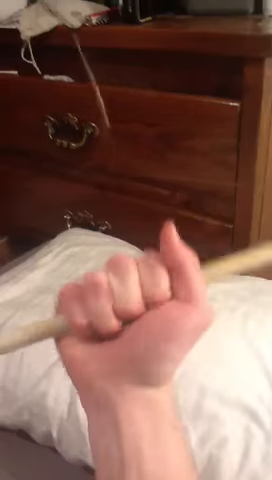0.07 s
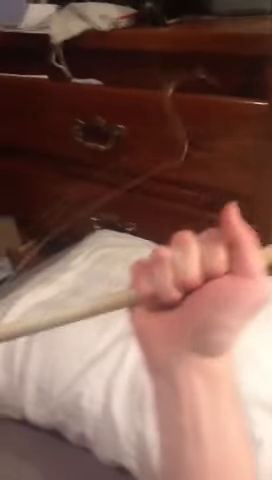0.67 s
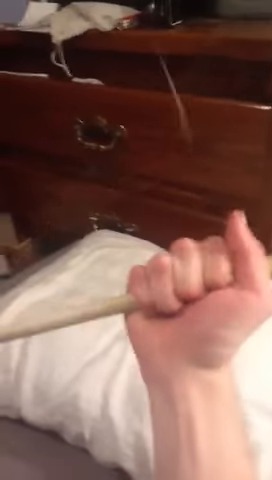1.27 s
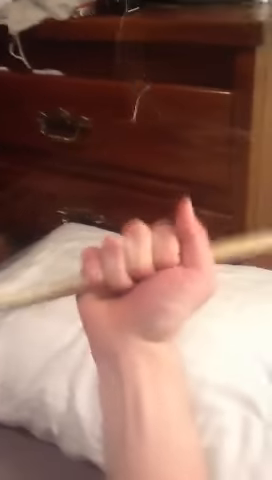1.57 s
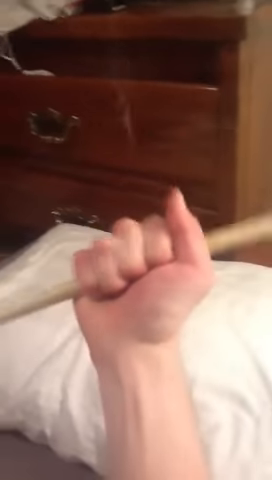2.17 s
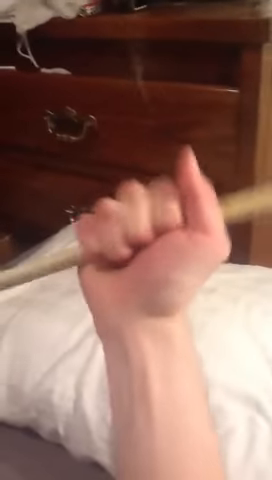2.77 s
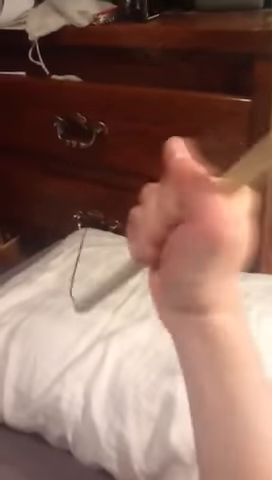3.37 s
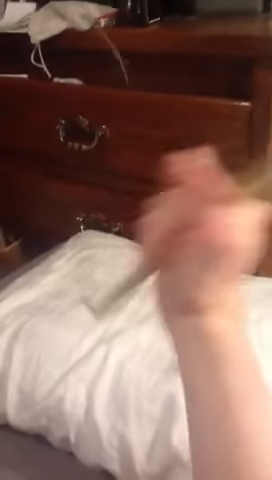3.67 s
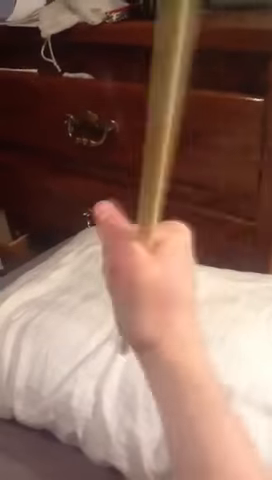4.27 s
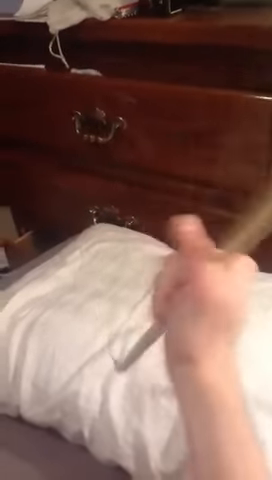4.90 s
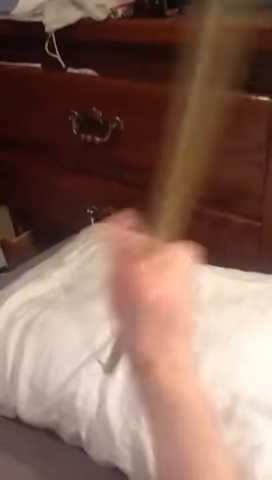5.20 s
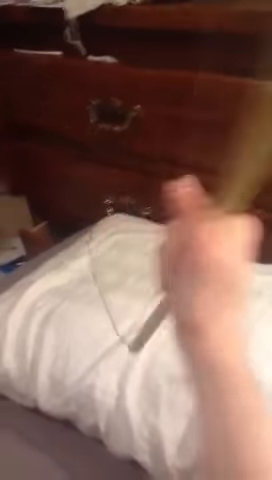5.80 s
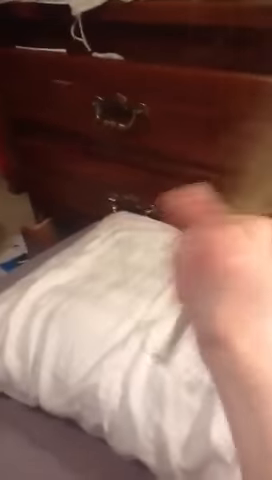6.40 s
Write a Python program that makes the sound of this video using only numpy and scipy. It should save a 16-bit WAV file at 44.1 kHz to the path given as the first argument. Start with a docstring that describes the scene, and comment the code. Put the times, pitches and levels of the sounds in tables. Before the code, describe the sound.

Short, high, falling squeaks repeat about five times a second as a hanger is swung, with soft knocks and scrapes over faint room hiss.

```python
"""A quiet bedroom, where a hand shakes a wood and wire hanger, then twirls it. On each swing the wire sticks
and slips in the wooden bar, making a short squeak that falls in pitch as the wire slows; harder, faster swings
squeak brighter. The wire knocks softly and low as it comes to rest. About halfway between squeaks the swing
back scrapes and grunts faintly. The moving hand rustles over the hiss of the room."""
import sys
import numpy as np
from scipy import signal
from scipy.fft import rfft, irfft
from scipy.io import wavfile

SR = 44100
rng = np.random.default_rng(int(sys.argv[2]) if len(sys.argv) > 2 else 0)


def store_pcm(level_fs):
    """Save levels as 16-bit WAV."""
    pcm = np.round(np.clip(level_fs, -1, 1) * 32767).astype(np.int16)
    wavfile.write(sys.argv[1], SR, np.atleast_2d(pcm).T)


N = 293265

# The forward swings. Each row: start in seconds, starting pitch of the squeak in Hz,
# force in dB compared with a full swing.
FORWARD_SWINGS = [(0.2962, 1966, 0), (0.5079, 2026, -0.5), (.699, 1967, 1), (0.8684, 1763, -8),
                  (1.049, 1960, -1), (1.2343, 1956, .5), (1.4224, 1993, 1), (1.612, 2035, 0),
                  (1.803, 2079, -1), (1.9967, 2136, -0.5), (2.1902, 2108, -1), (2.3919, 2109, -0.5),
                  (2.5905, 2075, -1), (2.789, 2145, 1.5), (2.9831, 2180, 0.5), (3.1851, 2169, 0.5),
                  (3.3832, 2095, 1.6), (3.547, 1560, -12.5), (3.719, 2000, -4), (3.8989, 2000, -4),
                  (4.0845, 1973, 1), (4.2677, 1982, 0), (4.4434, 1972, 0.5), (4.6238, 2066, 0),
                  (4.792, 1964, -4), (4.9583, 1820, -6), (5.1526, 1960, 0.5), (5.3463, 1977, 1.5),
                  (5.5343, 1992, 0), (5.7139, 1952, -1), (5.8981, 1942, 1), (6.0891, 1996, 3),
                  (6.2799, 2020, 2.5), (6.46, 1982, 1), (6.6294, 1865, -3.5)]
# A typical swing back, first shaken, then twirled. Each row: overall level in dB,
# base pitch of the grunt in Hz, extra gain for the grunt in dB.
TYPICAL_SWING_BACK = [(-43.5, 720, -2), (-47.5, 770, -4)]
TWIRL_START_S = 3.3
EASY_SLIP_S = (0.0345, 0.038)  # how long the wire slips on an easy swing: shaken, twirled


def amp(db):
    """Turns decibels into a gain to multiply by."""
    return 10 ** (np.asarray(db) / 20)


def unit_level(x):
    """Scales a signal so that its average power is one."""
    return x / np.sqrt(np.mean(x ** 2) + 1e-20)


def value_at(points, hz):
    """Reads between (Hz, value) points, with octaves evenly spaced."""
    points_hz, values = np.transpose(points)
    return np.interp(np.log(hz + 1), np.log(points_hz), values)


def add(mix, start_s, sound):
    """Adds a sound into the mix at its start time."""
    part = mix[round(start_s * SR):][:len(sound)]
    part += sound[:len(part)]


def together(sounds):
    """Mixes (start in seconds, sound) pairs into one such pair."""
    first_s = min(s for s, _ in sounds)
    mix = np.zeros(max(round((s - first_s) * SR) + len(sound) for s, sound in sounds))
    for s, sound in sounds:
        add(mix, s - first_s, sound)
    return first_s, mix


def noise(spectrum, size):
    """Noise of power one, with its bass and treble shaped by (Hz, dB) points."""
    gain = amp(value_at(spectrum, np.fft.rfftfreq(size, 1 / SR)))
    return unit_level(irfft(rfft(rng.standard_normal(size)) * gain, size))


def wander(size, hz):
    """A smooth random wobble that changes about hz times a second."""
    smoothing = signal.butter(2, min(hz, SR / 3), fs=SR, output="sos")
    return unit_level(signal.sosfilt(smoothing, rng.standard_normal(size)))


def haste(pitch_hz, easy_hz=1987.4):
    """How much faster the wire slips than on an easy swing: 0.1 is a tenth faster, slower counts as 0."""
    return max(pitch_hz / easy_hz - 1, 0)


def room_hiss(level_db=-65.5):
    """The steady hiss of the still room."""
    # The tone of the hiss. Each row: frequency in Hz, relative strength in dB.
    hiss_spectrum = [(35, -59), (60, -42), (115, -4.5), (163, -2), (950, -13.5), (1200, -10.5),
                     (1860, -10.5), (2090, -11), (2350, -12.5), (3740, -12.5), (6370, -12), (13700, -13),
                     (15400, -14.5)]
    return amp(level_db) * noise(hiss_spectrum, N)


def hand_rustle(trim_db=-2, lumps_db=2):
    """The moving hand and arm make a soft, lumpy rustle."""
    # How the rustle swells and fades. Each row: time in seconds, level in dB before the trim.
    swells = [(0.15, -74.5), (0.6, -84), (0.78, -63.5), (0.85, -74.5), (1.24, -68), (1.32, -81),
              (2.18, -90), (2.48, -70), (2.9, -78.5), (3.24, -73.5), (3.7, -81.5), (5.7, -84), (6.3, -73.5),
              (6.6, -75)]
    # The tone of the rustle. Each row: frequency in Hz, relative strength in dB.
    rustle_spectrum = [(30, -50), (70, -57), (130, -1), (200, -7.5), (270, 0), (400, -12.5), (900, -30.5),
                       (2500, -39)]
    db = np.interp(np.arange(N) / SR, *np.transpose(swells))
    rustle = noise(rustle_spectrum, N)
    lumps = amp(lumps_db * wander(N, 20))
    return amp(db + trim_db) * unit_level(rustle * lumps)


def dry_scrape(envelope, twirled):
    """Wire rubbing on wood makes grainy noise; the envelope sets its loudness over time."""
    # The tone of the rubbing. Each row: frequency in Hz, relative dB when shaken, and when twirled.
    scrape_spectra = [(206, -57, -12), (637, 6.5, -4.5), (920, -8, -16), (1720, 12.5, 5), (2400, 7, -1),
                      (4620, 8, 4), (5940, 4, -2.5), (7100, 1.5, -7), (11500, 3, -8), (15200, -4.5, -26)]
    spectrum = [(hz, db[twirled]) for hz, *db in scrape_spectra]
    grain = amp(1.3 * wander(len(envelope), 500))
    return noise(spectrum, len(envelope)) * envelope * grain


def back_slips(twirled, wind_up_s=0.2, wind_up_db=-48.5, gap_share=0.378, turn_wait_s=0.0264):
    """Plans the swings back, each as lively as the forward swings on either side of it."""
    typical_db, grunt_hz, grunt_db = TYPICAL_SWING_BACK[twirled]
    # shaking begins with a gentle pull back before the first squeak
    slips = [] if twirled else [(wind_up_s, wind_up_db, grunt_hz, grunt_db)]
    for before, after in zip(FORWARD_SWINGS, FORWARD_SWINGS[1:]):
        if (before[0] > TWIRL_START_S) == twirled:
            _, pitch_hz, force_db = np.mean([before, after], axis=0)
            start_s = before[0] + gap_share * (after[0] - before[0]) + turn_wait_s
            db = typical_db + 0.9 * force_db + 18 * haste(pitch_hz)
            higher, louder = rng.standard_normal(2)  # no two grunts are alike
            slips.append((start_s, db, grunt_hz * np.exp(0.092 * higher), grunt_db + 2.3 * louder))
    return slips


def swing_back(slip, twirled, scrape_db=-15, grunt_db=-18, grunt_s=0.0267, catch_s=0.0046,
               slide_db=-1.5, slide_peak_s=0.028, slide_width_s=0.013):
    """The wire catches with a low, rough, falling grunt, then slides back with a dry scrape."""
    start_s, db, base_hz, extra_grunt_db = slip
    t = np.arange(SR // 10) / SR
    catch = t / catch_s * np.exp(1 - t / catch_s)
    slide = amp(slide_db) * np.exp(-((t - slide_peak_s) / slide_width_s) ** 2) * np.minimum(t / catch_s, 1)
    scrape = dry_scrape(np.hypot(catch, slide), twirled)
    speed = np.maximum(1 - (t / grunt_s) ** 2, 0)
    hz = 1.12 * base_hz * speed * (1 + 0.22 * wander(len(t), 400))
    phase = 2 * np.pi * np.cumsum(hz) / SR
    grunt = (np.sin(phase) + 0.5 * np.sin(2 * phase)) * catch * speed
    sound = amp(scrape_db) * scrape + amp(grunt_db + extra_grunt_db) * grunt
    return start_s - 0.003, amp(db) * sound


def bar_thud(start_s, force_db, twirled, full_force_db=(-63, -64.5), rise_s=0.0028):
    """As the wire slows and comes to rest in the wooden bar, it knocks with a soft, dead thud."""
    # The tone of the thud. Each row: frequency in Hz, relative dB when shaken, and when twirled.
    thud_spectra = [(50, -45, -31), (131, -5, 3), (260, -2, 2.5), (645, 1.5, -3), (1020, -6, -14),
                    (1630, 3, 0), (5000, -60, -60)]
    spectrum = [(hz, db[twirled]) for hz, *db in thud_spectra]
    t = np.arange(SR // 20) / SR
    envelope = t / rise_s * np.exp(1 - t / rise_s)
    return start_s, amp(full_force_db[twirled] + force_db) * noise(spectrum, len(t)) * envelope


def forward_slips(twirled, shortening=1.2):
    """Plans the forward slips: force and haste brighten the squeak, and haste also shortens it."""
    # The squeak's three parts: main tone, octave, and bright edge of higher overtones. Each row:
    # level in dB when shaken, and when twirled, dB added per dB of force, dB added per unit of haste.
    squeak_parts = [(-38.5, -45.5, 0.96, 4), (-50.5, -48.5, 1.76, 13), (-48, -50.5, 1, 22.5)]
    slips = []
    for start_s, pitch_hz, force_db in FORWARD_SWINGS:
        if (start_s > TWIRL_START_S) == twirled:
            levels_db = [db[twirled] + per_force * force_db + per_haste * haste(pitch_hz)
                         for *db, per_force, per_haste in squeak_parts]
            slip_s = EASY_SLIP_S[twirled] * np.exp(-shortening * haste(pitch_hz))
            slips.append((start_s, pitch_hz, slip_s, *levels_db))
    return slips


def creeping_scratch(slip, twirled, relative_db=-8, swell_s=0.004):
    """A short dry scratch swells while the wire is about to break loose."""
    start_s, *_, edge_db = slip
    t = np.arange(-5 * swell_s, swell_s, 1 / SR)
    envelope = amp(edge_db + relative_db) * np.exp(-abs(t) / swell_s)
    return start_s + t[0], dry_scrape(envelope, twirled)


def hanger_ring(twirled, base_db=-17, base_above_hz=1500, size=16384):
    """How the hanger rings after one tiny jerk, heard from one side or the other."""
    # The notes the hanger rings at. Each row: frequency in Hz, width in Hz,
    # relative strength in dB when shaken, and when twirled.
    resonances = [(600, 32, -8.5, -22), (1340, 190, -17, -5), (1569, 136, -2, 3.5), (1721, 68, 3.5, 4.5),
                  (1867.5, 8.5, 0, 7), (1887, 140, 3.5, -4.5), (2120, 100, 2.5, 1.5), (3689, 210, 0, 2),
                  (4285, 130, -1.5, -5), (5180, 780, -10.5, -2), (6220, 360, -7.5, -40),
                  (7730, 2100, -15.5, -3.5), (11700, 3800, -10.5, -11)]
    hz = abs(np.fft.fftfreq(size, 1 / SR))
    broad_base = amp(base_db) ** 2 * hz ** 4 / (hz ** 4 + base_above_hz ** 4)
    peaks = sum(amp(db[twirled]) ** 2 / (1 + (2 * (hz - peak_hz) / width_hz) ** 2)
                for peak_hz, width_hz, *db in resonances)
    log_gain = np.log(broad_base + peaks) / 2
    spectrum = np.exp(signal.hilbert(log_gain).conj())  # puts the ringing after the jerk, not before
    return np.fft.ifft(spectrum).real


def wood_blur(x, share, decay_s=0.0024, above_hz=2700):
    """Countless brief, high vibrations of the wood blur the treble, anew as the wire shifts."""
    t = np.arange(SR // 60) / SR
    ringing = rng.standard_normal(len(t)) * np.exp(-t / decay_s)
    treble = signal.sosfiltfilt(signal.butter(4, above_hz, "high", fs=SR, output="sos"), x)
    blurred = signal.fftconvolve(treble, ringing / np.linalg.norm(ringing))[:len(x)]
    return x - treble + np.sqrt(1 - share) * treble + np.sqrt(share) * blurred


def squeak(slip, ring, twirled, wire_hz=1875, pull=0.55, reach_hz=130, jitter=0.011, strain=0.25,
           creep_db=-19, creep_s=0.004, attack_s=0.002, flutter_db=1.65, fade=0.88, edge_fade=1.65):
    """The wire sticks and slips fast enough to make a note, which falls and turns ragged as it slows."""
    # How the slip ends, first shaken, then twirled. Each row: dip in dB on leaving the wire's own note,
    # pitch in Hz at which it stalls, raggedness at a standstill from 0 to 1.
    endings = [(-5, 1220, 0.11), (-5.5, 1220, 0.32)]
    dip_db, stall_hz, raggedness = endings[twirled]
    start_s, pitch_hz, slip_s, tone_db, octave_db, edge_db = slip
    t = np.arange(-3 * creep_s, slip_s, 1 / SR)
    speed = 1 - (t / slip_s) ** 2
    glide_hz = pitch_hz * speed
    # the falling pitch clings to the wire's own note, then breaks away with a brief dip in level
    detune = (glide_hz - wire_hz) / reach_hz
    hz = glide_hz - pull * reach_hz * detune * np.exp(-detune ** 2)
    dip = amp(dip_db * np.exp(-(2 * (detune + 1)) ** 2))
    # fast strokes and dying ones slip unevenly
    uneven = jitter + strain * max(pitch_hz / wire_hz - 1, 0) + raggedness * (1 - speed)
    hz = hz * (1 + uneven * wander(len(t), 946))
    phase = 2 * np.pi * np.cumsum(hz) / SR
    # the wire creeps softly for an instant, breaks loose, and stalls once it is too slow
    creep = amp(creep_db) * np.exp(np.minimum(t, 0) / creep_s)
    loose = 1 - np.exp(-(np.maximum(t, 0) / attack_s) ** 2)
    moving = 0.5 + 0.5 * np.tanh((glide_hz - stall_hz) / reach_hz)
    envelope = (creep + loose) * moving * amp(flutter_db * wander(len(t), 350))
    # each release is a sharp jerk with a puff of grit
    jerks = sum(np.cos(k * phase) * (k * hz < SR / 2) / k ** 1.3 for k in range(3, 16))
    grit = (1 + np.cos(phase)) * noise([(900, -18), (2600, 7.0), (6000, 1.5), (15000, 1)], len(t))
    rasp = unit_level(jerks) + 0.9 * unit_level(grit)
    # all three parts ring through the hanger; the upper two fade sooner
    tone = signal.fftconvolve(np.sin(phase) * envelope * dip * speed ** fade, ring)
    octave = signal.fftconvolve(np.sin(2 * phase) * envelope * speed ** (2 * fade), ring)
    edge = signal.fftconvolve(rasp * envelope * speed ** edge_fade, ring)
    octave = wood_blur(octave, share=0.36)
    edge = wood_blur(edge, share=0.21)
    # each part gets the energy of a steady 16 ms sound at its level
    parts = [(tone, tone_db), (octave, octave_db), (edge, edge_db)]
    return start_s + t[0], sum(amp(db) * x * np.sqrt(0.016 * SR / np.sum(x ** 2)) for x, db in parts)


def settling_scrape(slip, twirled, relative_db=(-8, -10), rub_db=-8, peak_s=0.036, width_s=0.015):
    """The wire rubs dry under the squeak and scrapes once more as it comes to rest."""
    start_s, _, slip_s, _, _, edge_db = slip
    t = np.arange(SR // 10) / SR
    rub = amp(rub_db) * np.sin(np.pi * np.minimum(t / slip_s, 1))
    last_scrape = np.exp(-((t - peak_s) / width_s) ** 2)
    envelope = amp(edge_db + relative_db[twirled]) * np.hypot(rub, last_scrape)
    return start_s, dry_scrape(envelope, twirled)


def bedroom(x, twirled, tail_db=(-12.5, -14.0), gap_s=0.006):
    """Near echoes that shift as the hanger moves, and a short tail that loses its treble first."""
    # How long the room rings. Each row: frequency in Hz, seconds to fade by 60 dB.
    fade_times = [(300, 0.62), (1800, 0.21), (4000, 0.25), (8000, 0.15), (15000, 0.084)]
    # Echoes off furniture and walls. Each row: delay in seconds, level in dB when shaken, and when
    # twirled. Turned on end to twirl, the hanger sends much more sound into the last echo.
    echoes = [(.0042, -18.5, -20.5), (.0075, -9, -10.5), (0.0236, -34, -11.5)]
    t = np.arange(SR // 3) / SR
    reflections = rng.standard_normal(len(t)) * (rng.random(len(t)) < 0.2) * (t > gap_s)
    hz, frame_s, bands = signal.stft(reflections, SR, nperseg=256)
    decay = amp(-60 * frame_s / value_at(fade_times, hz)[:, None])
    _, tail = signal.istft(bands * decay, SR, nperseg=256)
    response = amp(tail_db[twirled]) * tail / np.linalg.norm(tail)
    response[0] += 1  # the direct sound
    dulling = signal.windows.hann(15) / signal.windows.hann(15).sum()  # bedding dulls each echo
    for delay_s, *db in echoes:
        add(response, delay_s + rng.normal(0, 0.00037), amp(db[twirled]) * dulling)
    return signal.fftconvolve(x, response)


def hanger_swings(twirled, thud_after_share=(0.48, 0.35), back_thud_db=-5):
    """All the forward and back swings of the shaken or the twirled hanger, heard in the room."""
    ring = hanger_ring(twirled)
    forces_db = [db for start_s, _, db in FORWARD_SWINGS if (start_s > TWIRL_START_S) == twirled]
    strokes = []
    for slip, force_db in zip(forward_slips(twirled), forces_db):
        thud_s = slip[0] + thud_after_share[twirled] * EASY_SLIP_S[twirled]
        thud = bar_thud(thud_s, force_db, twirled)
        scratch = creeping_scratch(slip, twirled)
        strokes.append([scratch, squeak(slip, ring, twirled), thud, settling_scrape(slip, twirled)])
    for slip in back_slips(twirled):
        start_s, db, _, _ = slip
        force_db = db - TYPICAL_SWING_BACK[twirled][0]
        thud = bar_thud(start_s, back_thud_db + force_db, twirled)
        strokes.append([thud, swing_back(slip, twirled)])
    mix = np.zeros(N)
    for start_s, sound in map(together, strokes):
        add(mix, start_s, bedroom(sound, twirled))
    return mix


def scene():
    """The hanger is shaken, then twirled, over the hand's rustle and the room's hiss, in one channel."""
    shaken = hanger_swings(twirled=False)
    twirled = hanger_swings(twirled=True)
    return (shaken + twirled + hand_rustle() + room_hiss())[None]


def record(dry, silent_s=0.12, low_cut_hz=48, high_cut_hz=15550):
    """Starts with a moment of silence and cuts away the deep bass and the very highest treble."""
    audible = np.arange(N) / SR > silent_s
    bass_cut = signal.butter(2, low_cut_hz, "high", fs=SR, output="sos")
    treble_cut = signal.firwin(511, high_cut_hz, window=("kaiser", 9), fs=SR)
    thinned = signal.sosfilt(bass_cut, dry * audible)
    return signal.oaconvolve(thinned, treble_cut[None], "same")


dry = scene()
out = record(dry)
store_pcm(out)
```